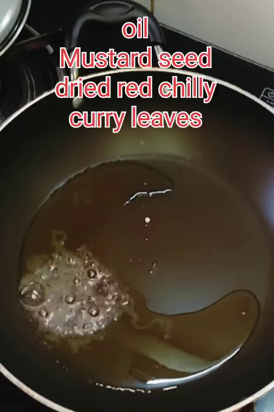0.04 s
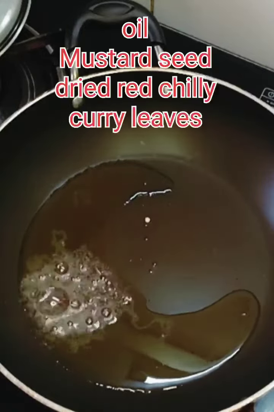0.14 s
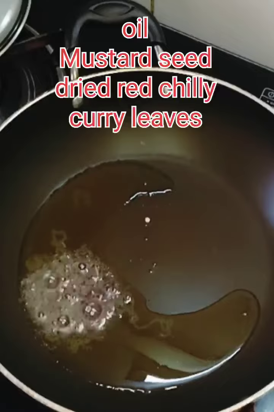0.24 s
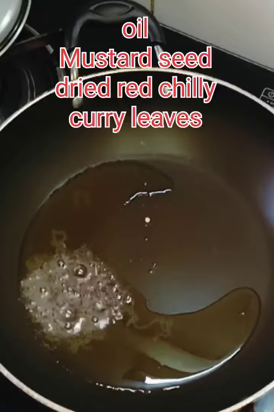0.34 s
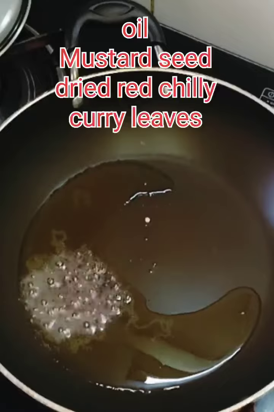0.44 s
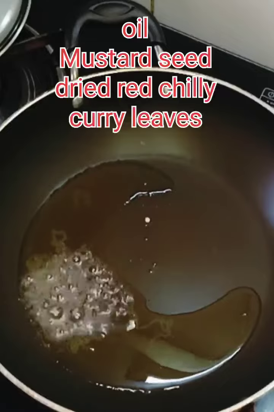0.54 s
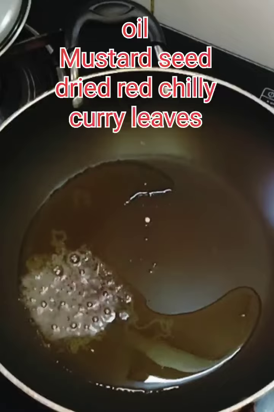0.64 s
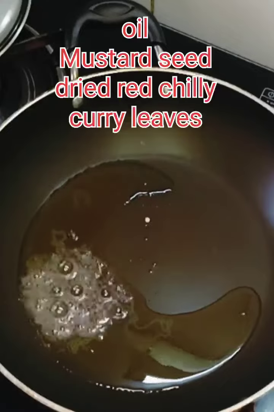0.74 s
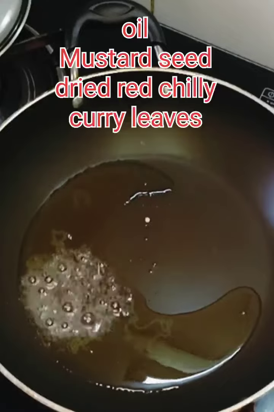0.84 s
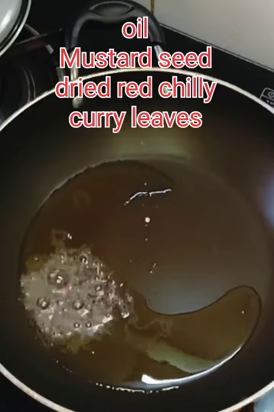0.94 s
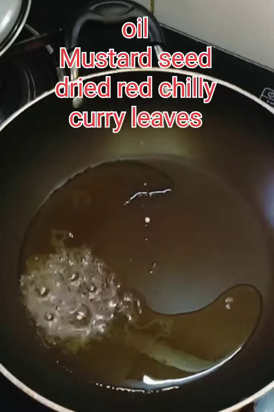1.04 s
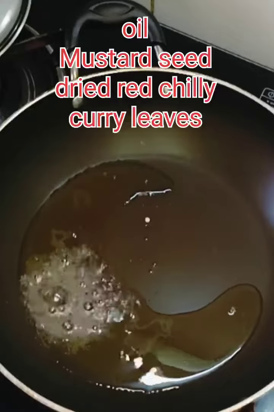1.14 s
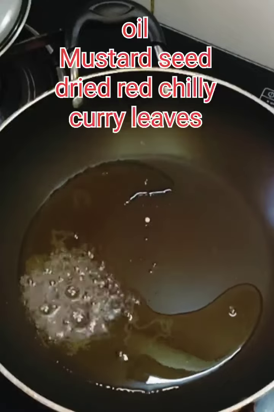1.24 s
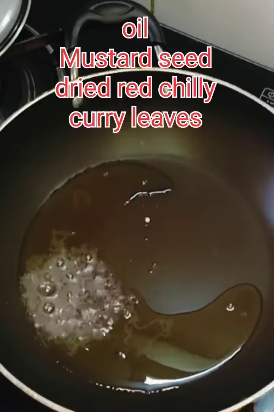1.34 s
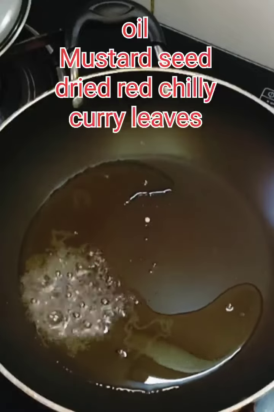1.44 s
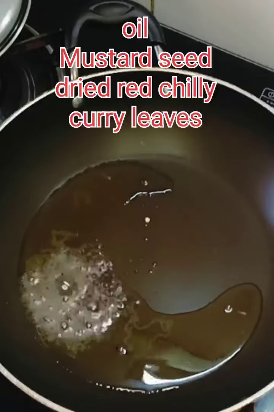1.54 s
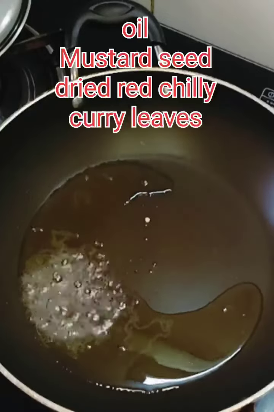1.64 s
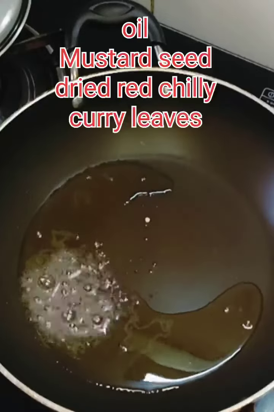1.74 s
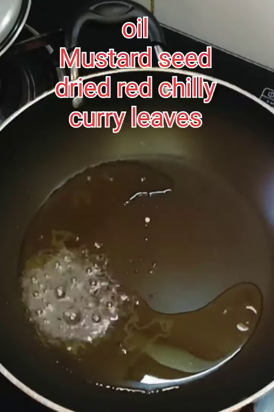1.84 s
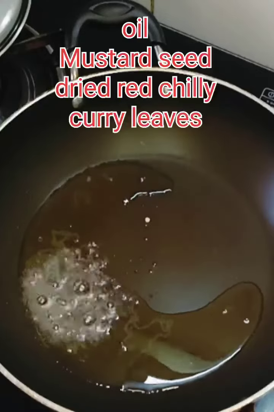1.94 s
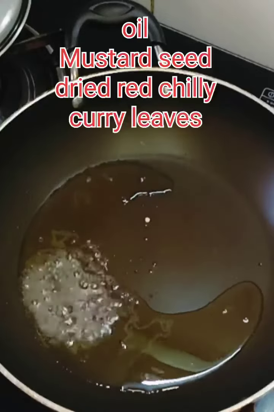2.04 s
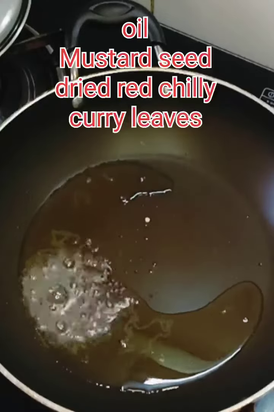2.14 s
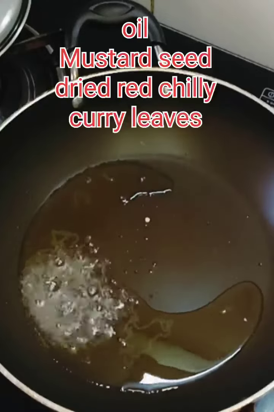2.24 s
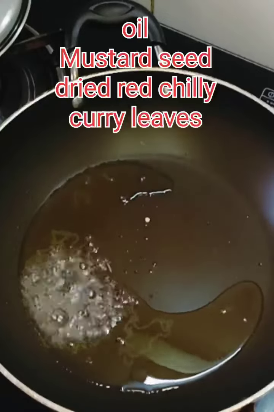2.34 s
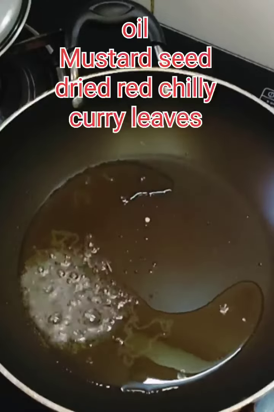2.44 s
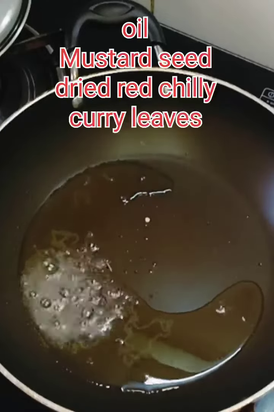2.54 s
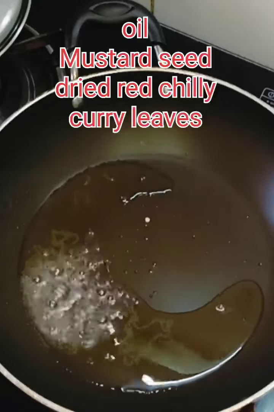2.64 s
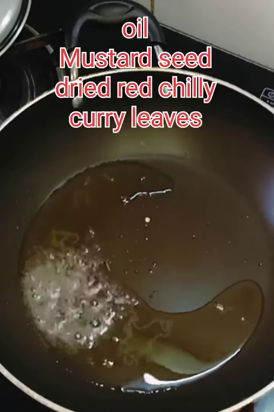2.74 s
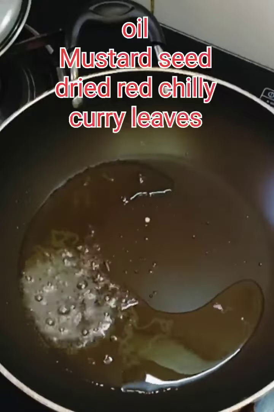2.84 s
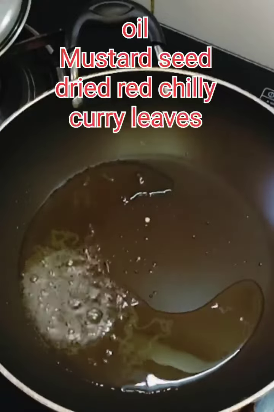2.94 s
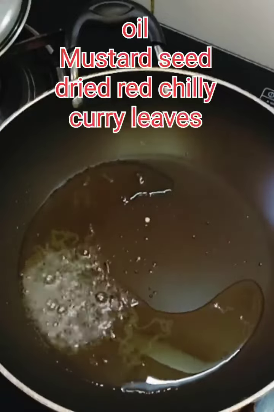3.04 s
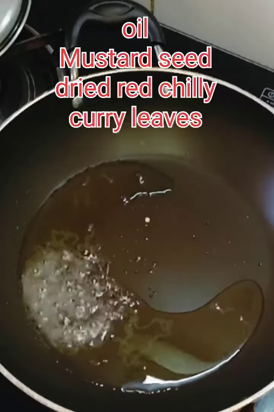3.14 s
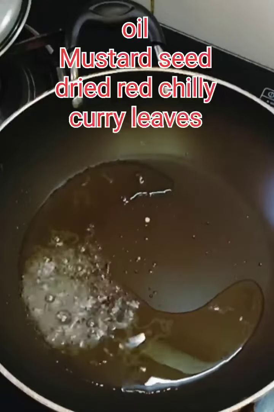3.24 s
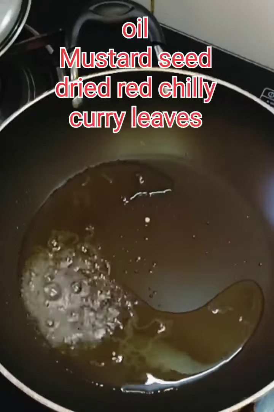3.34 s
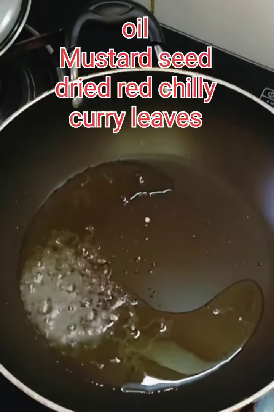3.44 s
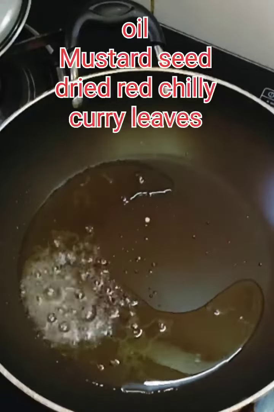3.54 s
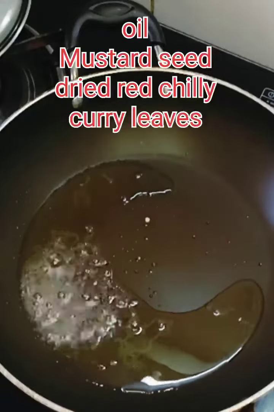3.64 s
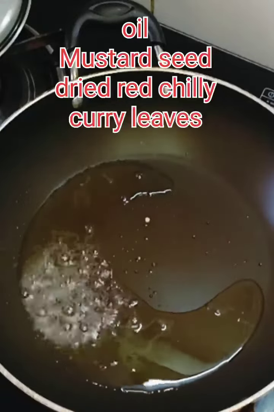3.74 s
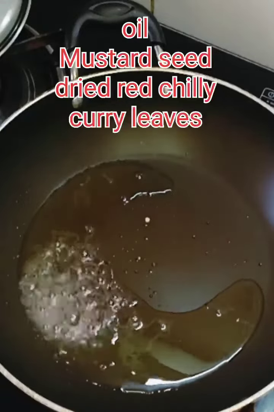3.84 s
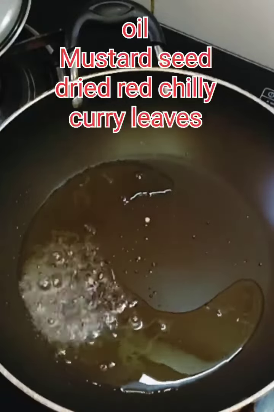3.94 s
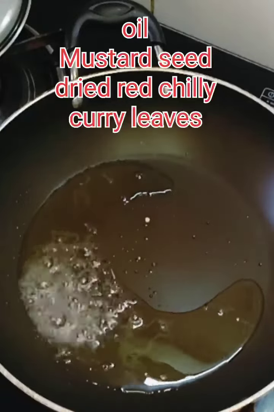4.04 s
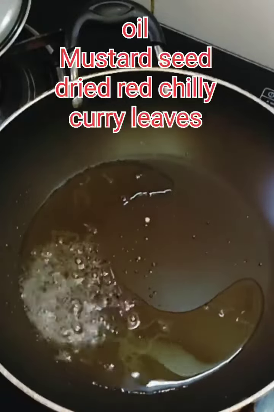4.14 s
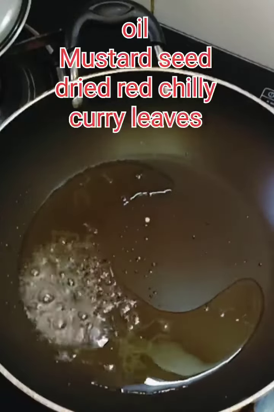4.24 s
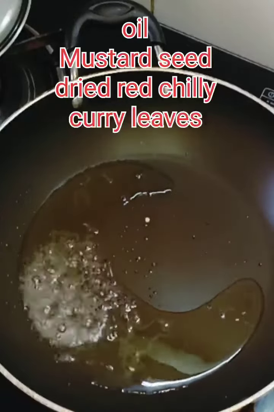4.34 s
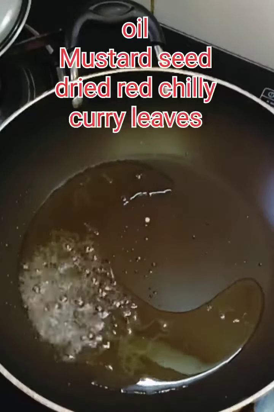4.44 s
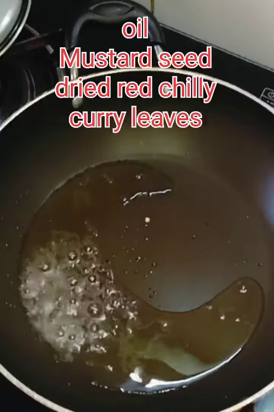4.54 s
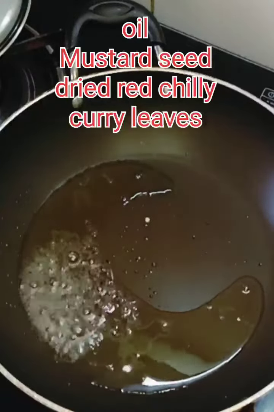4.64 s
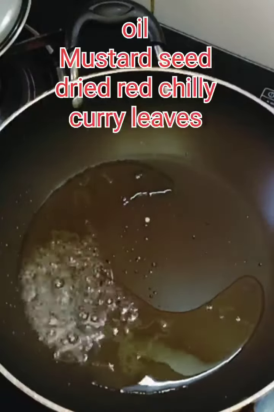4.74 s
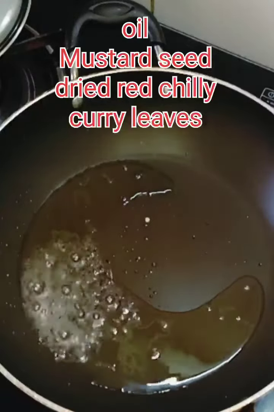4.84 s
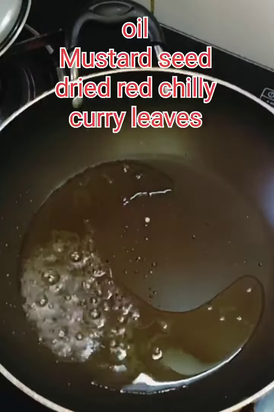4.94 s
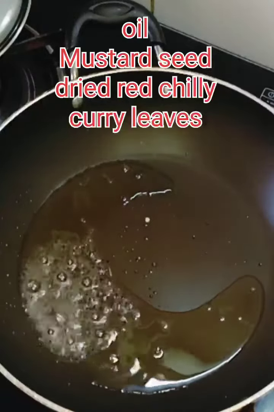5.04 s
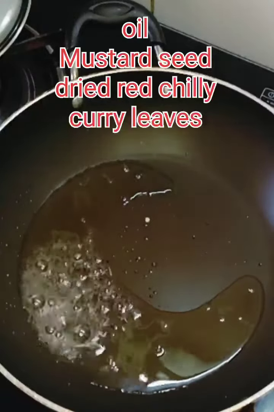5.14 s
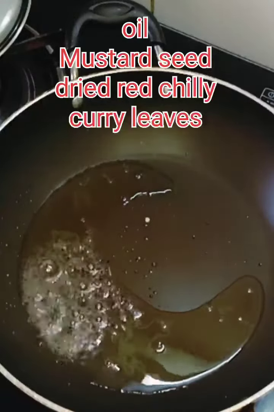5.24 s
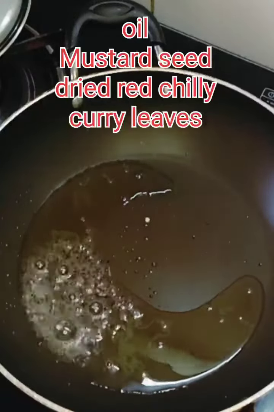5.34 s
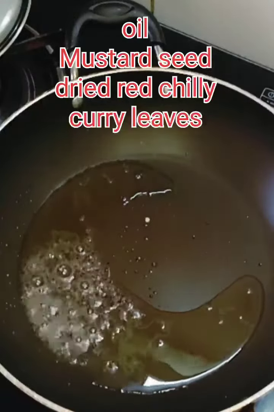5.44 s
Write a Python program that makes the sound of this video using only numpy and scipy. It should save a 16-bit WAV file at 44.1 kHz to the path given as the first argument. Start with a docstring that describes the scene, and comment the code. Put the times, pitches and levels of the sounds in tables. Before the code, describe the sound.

Mustard seeds crackle in frying oil, heard up close in a small, dry-sounding kitchen. Quiet hissing spurts and isolated sharp ticks give way to crowded pops, bubbling spits and wisps of steam. The frying is busiest in the second half, then eases. Faint metallic pan resonance colours the pops, over a steady dull background rush and a few low knocks. Mono sound, with the extreme top treble cut.

```python
"""Mustard seeds pop in a pan of hot oil on a kitchen cooktop.
Each husk snaps, rings its steam bubble and lets out a wisp of steam; among the pops the foam spits longer spurts.
As the frying builds, the sizzle rises, small pops crowd in and the bubbles grow and ring lower.
The sounds are made of shaped noise bursts and struck resonances.
Under them lie the low rush of the kitchen and a few soft bumps."""
import sys
import numpy as np
from scipy import signal
from scipy.io import wavfile

SR = 44100
rng = np.random.default_rng(int(sys.argv[2]) if len(sys.argv) > 2 else 0)


def inscribe(sig):
    """Save sig as 16-bit PCM at rate SR to the path in sys.argv[1].

    A 1-D sig is mono; a 2-D sig holds one channel per row.
    Samples are clipped to [-1, 1] before scaling.
    """
    pcm = np.round(np.clip(np.atleast_2d(sig).T, -1, 1) * 32767)
    wavfile.write(sys.argv[1], SR, pcm.astype(np.int16))


N = 242624  # length of the scene in samples

# how the pan passes on the ring of a bubble: [f/Hz, relative level/dB]
PAN_COLOUR = [(100, 0), (500, 16), (830, 4.5), (1080, 2), (1450, -0.5), (2200, 3.5), (3000, 3.5),
              (3800, -1.5), (5300, 3), (7000, -6.5), (12000, -6.5)]


def seeds(leak_lead_s=0.0092, leak_s=0.034, leak_db=-22, leak_hiss_db=-30,
          wisp_s=0.018, wisp_bubbling_db=-21.5, wisp_hiss_db=-15.5, wisp_share=0.43):
    """A bubble leaks just before it bursts, the husk snaps, and a wisp of steam follows, brighter after a bright snap."""
    # the pops at set times, loud and faint, levels before the trims in pop():
    # [t/s, bubble pitch f/Hz, bubble ring level/dB, husk snap level/dB, extra top treble of the snap/dB]
    timed_pops = [(.336, 2850, -32.5, -28.5, 4), (0.9044, 3200, -33, -18.5, 5),
                  (1.0366, 2840, -23, -16.5, 8), (1.1871, 4030, -23.5, -27, -17),
                  (1.251, 2830, -39, -23, 9), (1.3076, 3000, -60, -32, 7), (1.5135, 2900, -37, -34.5, -10),
                  (1.551, 2860, -35, -30, 11), (1.7982, 3140, -21, -33, 8), (1.8588, 2900, -20.5, -29, 9),
                  (1.9069, 2410, -41, -31, 5), (1.9497, 3100, -23.5, -25, 3), (2.082, 3020, -30, -17.5, 3),
                  (2.1067, 5590, -33, -18, 8), (2.1433, 3100, -15, -19, 1), (2.1908, 2550, -16.5, -20, -16),
                  (2.222, 3150, -26, -21.5, -16), (2.236, 2840, -16, -43, -10),
                  (2.2544, 2450, -23.5, -46, -23), (2.2959, 2140, -21.5, -19, 6),
                  (2.4484, 2226, -14.5, -30.5, -2), (2.5673, 2600, -22.5, -30.5, -5),
                  (2.6293, 3020, -28, -35, -11), (2.6356, 2530, -9.5, -45, 11),
                  (2.652, 2800, -17.5, -24, 0), (2.7667, 2460, -19.5, -19, -2),
                  (2.8078, 3070, -25.5, -13.5, -2), (2.8525, 2550, -17.5, -37, 10),
                  (2.8811, 4000, -34, -31, -17), (2.9325, 2730, -29, -28.5, -15),
                  (2.9465, 1860, -21, -28, -6), (2.968, 3200, -34, -34, 1), (3.0442, 5500, -31, -13.5, -13),
                  (3.0948, 4070, -16.5, -22.5, -33), (3.1232, 5060, -43, -11.5, 0),
                  (3.144, 5900, -19, -23, -14), (3.2246, 2080, -21, -29, 3), (3.2318, 2790, -32, -17, 4),
                  (3.253, 2176, -9.5, -24, 3), (3.2928, 3260, -22, -22, -16), (3.338, 3380, -18.5, -28, -7),
                  (3.4037, 2680, -16.5, -51, 0), (3.423, 2780, -22.5, -16.5, 8),
                  (3.447, 2510, -15.5, -28, -3), (3.4512, 2480, -32, -19, -2),
                  (3.5751, 5500, -23.5, -20, -26), (3.595, 5380, -38, -29.5, 10),
                  (3.659, 3900, -17.5, -38, 5), (3.717, 2670, -20, -28, -19),
                  (3.767, 2450, -18.5, -23.5, -16), (3.7892, 5560, -17.5, -20, -2),
                  (3.796, 5760, -24, -28, 12), (3.8162, 2380, -20.5, -21, 13),
                  (3.8309, 4340, -22, -23, -32), (3.848, 4660, -22, -25.5, -36),
                  (3.9385, 5600, -23, -16, -8), (4.0211, 2030, -15, -23.5, -43),
                  (4.0487, 1990, -13, -20.5, 7), (4.065, 2600, -14.5, -23, -24),
                  (4.146, 2400, -18, -29, -3), (4.165, 3050, -16, -31, 12), (4.1759, 2520, -10.5, -26, -12),
                  (4.2135, 2190, -17, -20, -10), (4.2265, 2160, -13, -22, -10), (4.236, 2380, -9.5, -29, 3),
                  (4.325, 2280, -9.5, -19.5, 3), (4.354, 2100, -25, -38, -2), (4.4, 2110, -23, -32.5, -5),
                  (4.4529, 2620, -17.5, -36, -7), (4.4559, 2800, -20, -20, 4),
                  (4.5593, 2020, -19.5, -25.5, -45), (4.6845, 2780, -15, -11, 5.5),
                  (4.746, 4600, -23, -30.5, -11), (4.7731, 2000, -12.5, -43, -7),
                  (4.812, 2290, -15.5, -24, -1), (4.8552, 3430, -27, -32.5, -26),
                  (4.9163, 2090, -5.5, -14, -8), (5.0305, 2580, -20, -24.5, 19),
                  (5.2147, 2260, -13.5, -26, -6), (5.2288, 4970, -22, -21.5, 0),
                  (5.3909, 4900, -25.5, -27.5, -3)]
    out = np.zeros(N)
    for s, hz, bubble_db, husk_db, top_db in timed_pops:
        leak = spurt(leak_s, hz, bubble_db + leak_db, bubble_db + leak_hiss_db)
        wisp = spurt(wisp_s, hz, bubble_db + wisp_bubbling_db, husk_db + wisp_hiss_db, wisp_share * top_db)
        add(out, s - leak_lead_s, leak)
        add(out, s, pop(hz, bubble_db, husk_db, top_db))
        add(out, s, wisp)
    return out


def pop(hz, bubble_db, husk_db, top_db, tear_s=0.00024, tear=0.3, wall_s=0.0015, wall=0.45,
        sharpness=6.74, torn_width=2.4, rattle=1.0, ring_db=-2.4, snap_db=-0.92):
    """A husk tears in a burst of fast-fading noise, and the steam bubble around it rings as a resonance."""
    # colour of a snapping husk: [f/Hz, relative level per Hz/dB]
    snap_colour = [(60, -33), (500, -5.5), (830, -8.5), (1050, -25), (2300, -6), (3300, -1), (3800, -12.5),
                   (5400, -2), (6300, -6), (7300, 5), (8200, 6.5), (9800, 1), (12000, -9.5), (15500, -20)]
    t = np.arange(SR // 14) / SR
    click = t == 0
    burst = click + tear * rng.standard_normal(len(t)) * np.exp(-t / tear_s)
    add(burst, wall_s * rng.uniform(.6, 1.6), wall * burst)  # first bounce off the pan wall
    snap = struck(through(burst, response(brightened(snap_colour, top_db))))

    # a hard snap tears the bubble wide open, so it rings only briefly
    torn = np.interp(husk_db - bubble_db, [-10, 2], [0, 1])
    width_hz = hz / sharpness * (1 + torn_width * torn)
    # a bubble that opens gently is pushed again one to four cycles later
    push = 1. * click
    add(push, rng.integers(1, 5) / hz, .9 * (1 - torn) * push)
    ring = resonate(push + rattle * burst, hz, width_hz)
    ring = through(ring, response(PAN_COLOUR))
    ring = struck(low_cut(ring, hz=900))  # so small a source radiates little bass

    snap_heard = gain_of(husk_db + snap_db) * echoed(snap, t, echo_db=-6.0)
    ring_heard = gain_of(bubble_db + ring_db) * echoed(ring, t, echo_db=-1.5)
    return snap_heard + ring_heard


def echoed(x, t, echo_db):
    """Echoes from the pan wall and the cooktop: random delayed copies, drawn anew for each sound."""
    # strength of the echoes: [t after the pop/s, relative level/dB]
    echo_strength = [(.002, 29), (.005, -13), (.007, 8.5), (.009, 15), (.0105, -4.5), (.015, -14),
                     (.02, -11), (.03, -80), (.06, -58)]
    strength = gain_of(np.interp(t, *np.transpose(echo_strength), left=-100))
    present = rng.random(len(t)) < .15
    taps = rng.standard_normal(len(t)) * present * strength
    return x + gain_of(echo_db) * np.std(x) * evened(through(x, taps))


def thumps():
    """A few of the heaviest pops also give a dull low thump: a click given a dull colour."""
    # the thumps: [t/s, level/dB]
    thump_times = [(1.0371, -22.5), (3.0441, -34), (3.7893, -30.5), (3.816, -33.5), (4.6844, -23)]
    # colour of a thump: [f/Hz, relative level per Hz/dB]
    thump_colour = [(25, -10), (100, 9.5), (400, 4), (800, 13), (1100, 2), (2500, -21), (8000, -63)]
    out = np.zeros(N)
    for s, db in thump_times:
        add(out, s, gain_of(db) * struck(response(thump_colour)))
    return out


def spurt(length_s, hz, bubble_db, steam_db, lift_db=0, bubble_width=0.3, crater_width_hz=3500,
          jet_width_hz=1300, jet=0.87, wet_top_db=-5, dry_top_db=2, bubbling_db=1.5, hiss_db=2.5, size=5000):
    """Steam escapes through the foam: a swell of tiny bursts that hiss and shake a bubble."""
    # colour of hissing steam: [f/Hz, relative level per Hz/dB]
    hiss_colour = [(150, -46), (600, -14.5), (850, 4), (1080, -2.5), (2000, -2), (3000, -3.5), (4000, -3.5),
                   (5500, -3), (6300, -2), (7600, -3), (8700, 1.5), (10000, 1.5), (12000, -4.5),
                   (15500, -4.5)]
    count = int(np.clip(length_s * SR, size // 20, size))  # at most size samples
    swell = np.sin(np.linspace(0, np.pi, count))

    # dry steam hisses brightly, a wet bubbling spurt is duller
    top_db = lift_db + np.interp(steam_db - bubble_db, [-8, 6], [wet_top_db, dry_top_db])
    hiss = crackle(size, per_s=3000, spread_db=4.0, smooth=0.63)[:count]
    hiss = evened(through(hiss, response(brightened(hiss_colour, top_db))))
    whistle = resonate(hiss, rng.uniform(7300, 8720), jet_width_hz)  # each jet has its own pitch
    hiss = evened(hiss + jet * evened(whistle))

    bubbling = crackle(size, per_s=900, spread_db=2.5, smooth=0.77)[:count]
    bubbling = resonate(bubbling, hz, bubble_width * hz)
    bubbling = resonate(bubbling, hz, crater_width_hz)  # the crater in the foam narrows it further
    bubbling = evened(through(bubbling, response(PAN_COLOUR)))
    return swell * (gain_of(steam_db + hiss_db) * hiss + gain_of(bubble_db + bubbling_db) * bubbling)


def foam(tick_ring_db=12, tick_snap_db=11, spit_s=0.037, spit_bubbling_db=2, spit_hiss_db=-4):
    """The foam lets out its spurts at set times, with small ticks and spits added at random."""
    # the spurts at set times, before the limits and trims in spurt():
    # [t/s, length t/s, bubble pitch f/Hz, bubbling level/dB, hiss level/dB]
    timed_spurts = [(0.382, 0.034, 2980, -35.5, -29), (.468, 0.069, 2980, -57, -50),
                    (0.743, 0.043, 3000, -50, -39.5), (0.834, 0.052, 2160, -46, -38.5),
                    (0.904, 0.023, 5040, -41, -30), (.936, .052, 2600, -59, -49),
                    (1.063, 0.065, 3020, -39.5, -31), (1.223, .05, 3180, -55, -45),
                    (1.322, 0.084, 3060, -48.5, -42.5), (1.402, 0.039, 2940, -39.5, -30),
                    (1.425, 0.086, 3000, -55, -39), (1.595, 0.042, 3020, -43, -34.5),
                    (1.703, 0.037, 3150, -50, -40.5), (1.786, 0.07, 2800, -36, -30),
                    (1.879, 0.03, 2640, -40.5, -51), (1.952, .022, 3030, -35, -30.5),
                    (1.967, 0.053, 1670, -47, -50), (2.05, .034, 2820, -46, -43),
                    (2.12, 0.048, 2900, -33.5, -32), (2.176, 0.049, 2600, -40, -35),
                    (2.249, 0.019, 6800, -30.5, -56), (2.288, 0.07, 2880, -34.5, -36.5),
                    (2.363, .045, 2700, -59, -42), (2.412, 0.028, 2700, -39, -40.5),
                    (2.452, 0.031, 2670, -31, -58), (2.507, 0.047, 3050, -34.5, -27),
                    (2.53, 0.068, 1590, -35.5, -46), (2.629, 0.035, 2470, -24, -52),
                    (2.707, 0.039, 6700, -42, -38), (2.728, 0.075, 2060, -39, -49),
                    (2.764, 0.044, 5100, -35.5, -37), (2.892, 0.072, 2760, -39.5, -40),
                    (2.987, 0.03, 2500, -28, -26.5), (3.13, 0.092, 2720, -40, -34.5),
                    (3.148, 0.044, 2040, -26, -50), (3.194, 0.034, 6100, -35, -39),
                    (3.282, 0.04, 1980, -33.5, -54), (3.332, 0.066, 2930, -36.5, -43),
                    (3.495, 0.041, 2160, -34, -36.5), (3.601, 0.052, 5400, -43, -39),
                    (3.624, 0.062, 1920, -31, -50), (3.671, 0.15, 2220, -32.5, -43),
                    (3.733, 0.029, 2260, -38, -29), (3.791, 0.03, 2590, -24.5, -33),
                    (3.83, .047, 4600, -28.5, -53), (3.875, .037, 2760, -37.5, -33),
                    (3.967, 0.043, 2060, -39.5, -31.5), (4.065, 0.02, 4640, -22.5, -52),
                    (4.067, 0.068, 2460, -29.5, -46), (4.139, 0.04, 5440, -27, -38),
                    (4.2, 0.054, 2380, -28, -37.5), (4.267, 0.03, 1880, -26.5, -43.5),
                    (4.41, 0.041, 5050, -27.5, -40), (4.414, 0.038, 2430, -28.5, -42),
                    (4.543, 0.073, 2620, -33, -40), (4.578, 0.044, 2420, -23.5, -30.5),
                    (4.622, 0.047, 2500, -28.5, -33), (4.671, 0.038, 4740, -30.5, -53),
                    (4.712, 0.037, 2630, -38.5, -36), (4.803, 0.029, 2230, -47, -39),
                    (4.864, 0.071, 2160, -32, -42.5), (4.944, 0.035, 4140, -33.5, -55),
                    (4.95, 0.029, 2830, -27, -39.5), (4.992, 0.03, 2060, -25, -40),
                    (5.044, 0.04, 2000, -40, -38), (5.143, 0.049, 1980, -37, -49.5),
                    (5.216, 0.017, 1810, -31, -45), (5.254, 0.022, 1950, -33, -43),
                    (5.293, 0.031, 2000, -35, -49), (5.356, 0.065, 2330, -38, -54),
                    (5.457, 0.044, 2640, -37.5, -39)]
    out = np.zeros(N)
    for s, *shape in timed_spurts:
        add(out, s, spurt(*shape))
    for s, hz, bubble_db, husk_db in small_bursts(count=30, spread_db=15):
        add(out, s, pop(hz, bubble_db + tick_ring_db, husk_db + tick_snap_db, top_db=-6))
    for s, hz, bubble_db, steam_db in small_bursts(count=60, spread_db=5):
        add(out, s, spurt(spit_s, hz, bubble_db + spit_bubbling_db, steam_db + spit_hiss_db))
    return out


def small_bursts(count, spread_db, crowding=1.6, start_hz=3280, sag_hz_per_s=257, scatter_octaves=.25,
                 young_share=.3, young_ratio=1.95):
    """Chance bursts, denser and louder the harder it fries: rows (s, bubble Hz, bubble dB, snap or hiss dB)."""
    draws, clock = rng.random((count, 5)), np.arange(N) / SR
    # share the bursts out in time by a running total of the frying
    due = np.cumsum(gain_of(crowding * frying_db(clock)))
    s = np.interp((np.arange(count) + draws[:, 0]) / count, due / due[-1], clock)
    # the bubbles grow as the foam spreads, so their usual pitch sinks
    usual_hz = start_hz - sag_hz_per_s * s
    hz = usual_hz * 2 ** (scatter_octaves * (2 * draws[:, 1] - 1))
    # some bubbles are young and small, and ring higher
    hz = hz * np.where(draws[:, 2] < young_share, young_ratio, 1)
    bubble_db, burst_db = frying_db(s) - spread_db * draws[:, 3:].T
    return zip(s, hz, bubble_db, burst_db)


def frying_db(s):
    """How hard the oil fries at time s, as a level that steers the sizzle, the simmer and the small bursts."""
    # course of the frying: [t/s, level before trims/dB]
    frying = [(0, -60), (.78, -58), (1.05, -52), (1.95, -50.5), (2.3, -43.5), (2.8, -48), (3.2, -45),
              (4.1, -42.5), (4.4, -47.5), (4.85, -43), (5.2, -50.5), (5.5, -52.5)]
    return np.interp(s, *np.transpose(frying))


def pan_ring(x):
    """The pan and the air in it ring faintly, as resonances driven by the pops and spurts."""
    # their modes: [f/Hz, width f/Hz, level/dB]
    pan_modes = [(833, 29, 3.5), (1433, 54, 2), (2037, 125, -9), (2520, 110, -28), (5430, 63, -11),
                 (8600, 60, -29)]
    return x + sum(gain_of(db) * resonate(x, hz, width_hz) for hz, width_hz, db in pan_modes)


def kitchen(x, t60=0.073, wet_db=-21):
    """A faint short tail from the room: fading noise that falls 60 dB in t60 seconds."""
    t = np.arange(SR // 2) / SR
    tail = rng.standard_normal(len(t)) * gain_of(-60 * t / t60) * (t > .008)
    return x + gain_of(wet_db) * through(x, tail / np.linalg.norm(tail))


def sizzle(trim_db=-2):
    """The fine sizzle of the oil: bright crackling noise that follows the frying."""
    # colour of the sizzle: [f/Hz, relative level per Hz/dB]
    fine_colour = [(2000, -5), (3000, -25), (4000, -9), (6300, -8.5), (8000, 1), (9500, -3.5), (12000, -13),
                   (15500, -13.5)]
    noise = crackle(N, per_s=1000, spread_db=4.5, smooth=3.8)
    noise = through(noise, response(fine_colour)) * waver(21.42, depth_db=4.0)
    return gain_of(frying_db(np.arange(N) / SR) + trim_db) * evened(noise)


def simmer(brisk_db=-45, brisk_level_db=-50.5, slope=1.87):
    """The simmer of the foam: crackling through a broad resonance, rising faster than the frying level."""
    noise = resonate(crackle(N, per_s=810, spread_db=6, smooth=0.35), 1840, 1140)
    noise = through(noise, response(PAN_COLOUR)) * waver(30, depth_db=2.5)
    # brisk_level_db holds when the frying level is at brisk_db; slope is dB of simmer per dB of frying
    level_db = brisk_level_db + slope * (frying_db(np.arange(N) / SR) - brisk_db)
    return gain_of(level_db) * evened(noise)


def bumps(rise_s=0.0014, overtone=0.23, overtone_ratio=2.3, shudder=0.47, shudder_hz=170,
          shudder_width_hz=110, linger=0.89, sag=0.57, settle_s=0.0032):
    """Dull low knocks, each starting high and settling at once, with one overtone and a brief shudder."""
    # the bumps: [t/s, settled pitch f/Hz, level/dB, time for the tone to fall 60 dB t/s]
    soft_bumps = [(1.669, 106, -31.5, 0.35), (2.057, 126, -32, 0.077), (2.708, 106, -31, 0.2),
                  (3.059, 108.6, -30, 0.19), (3.315, 108, -25.5, 0.14), (3.735, 73, -14, 0.036),
                  (4.865, 117, -29, 0.2)]
    out, t = np.zeros(N), np.arange(SR // 3) / SR
    for s, hz, db, t60 in soft_bumps:
        turns = np.cumsum(hz * (1 + sag * np.exp(-t / settle_s))) / SR  # cycles so far
        tone = np.sin(2 * np.pi * turns) + overtone * np.sin(2 * np.pi * overtone_ratio * turns)
        shake = resonate(rng.standard_normal(len(t)), shudder_hz, shudder_width_hz)
        shake = evened(resonate(shake, shudder_hz, shudder_width_hz))
        knock = shudder * shake * gain_of(-60 * t / (linger * t60)) - tone * gain_of(-60 * t / t60)
        add(out, s, gain_of(db) * (1 - np.exp(-t / rise_s)) * knock)
    return out


def kitchen_rush():
    """The low rush of the kitchen: noise with a dark colour and a wavering level."""
    # colour of the rush: [f/Hz, relative level per Hz/dB]
    rush_colour = [(20, -10), (55, -10.5), (105, 3), (165, 0.5), (235, -4.5), (350, -4), (420, -2.5),
                   (580, -1), (800, -8), (930, -7), (1200, -9), (2800, -20), (4500, -31), (12000, -49)]
    # course of the rush: [t/s, level/dB]
    rush_level = [(0, -48), (.78, -48), (1.05, -44.5), (3.2, -45.5), (5.5, -47)]
    noise = through(rng.standard_normal(N), response(rush_colour, size=8192)) * waver(22, depth_db=2.0)
    return gain_of(np.interp(np.arange(N) / SR, *np.transpose(rush_level))) * evened(noise)


def crackle(count, per_s, spread_db, smooth):
    """Tiny bursts of uneven size over a smooth hiss."""
    size = gain_of(spread_db * np.minimum(rng.exponential(1, count), 4)) * rng.choice([-1, 1], count)
    bursts = evened(size * (rng.random(count) < per_s / SR))
    return evened(bursts + smooth * rng.standard_normal(count))


def waver(per_s, depth_db):
    """A gain that wanders at random, with per_s new random levels each second."""
    knots = np.arange(0, N / SR + 1, 1 / per_s)
    return gain_of(depth_db * np.interp(np.arange(N) / SR, knots, rng.standard_normal(len(knots))))


def brightened(points, top_db):
    """Lifts or lowers the top treble of a colour, in full from 12 kHz up."""
    hz, db = np.transpose(points)
    return np.transpose([hz, db + top_db * np.interp(hz, [8200, 12000], [0, 1])])


def response(points, size=2048):
    """The impulse response of a colour: what a click becomes, with nothing heard before it."""
    hz, db = np.transpose(points)
    bins_hz = abs(np.fft.fftfreq(size, 1 / SR))
    log_gain = np.log(gain_of(np.interp(np.log(bins_hz + 1), np.log(hz), db)))
    spectrum = np.exp(np.conj(signal.hilbert(log_gain)))  # minimum phase: energy comes early
    return np.fft.ifft(spectrum).real[:size // 2]


def through(x, taps):
    """Passes x through an impulse response."""
    return signal.fftconvolve(x, taps)[:len(x)]


def resonate(x, hz, width_hz):
    """One resonance: the narrower it is, the longer it rings."""
    return signal.lfilter(*signal.iirpeak(hz, hz / width_hz, SR), x)


def low_cut(x, hz, order=2):
    """Weakens what lies below hz."""
    return signal.lfilter(*signal.butter(order, hz, "high", fs=SR), x)


def gain_of(db):
    """Decibels to gain."""
    return 10 ** (np.asarray(db) / 20)


def evened(x):
    """Scales to an rms (average strength) of 1."""
    return x / np.sqrt(np.mean(x ** 2) + 1e-20)


def struck(x, size=132):
    """Scales to rms 1 over the first size samples, three milliseconds by default."""
    return x / np.sqrt(np.mean(x[:size] ** 2) + 1e-20)


def add(mix, s, sound):
    """Adds a sound to the mix at time s."""
    part = mix[max(round(s * SR), 0):][:len(sound)]
    part += sound[:len(part)]


def scene():
    """The frying pan in its kitchen."""
    pan = kitchen(pan_ring(seeds() + foam()))
    background = sizzle() + simmer() + bumps() + kitchen_rush()
    return (pan + thumps() + background)[None]


def record(dry, low_cut_hz=36, edge_hz=15650):
    """The microphone sheds the deepest bass, peaks are clipped at full scale, then the top treble is cut off."""
    heard = np.clip(low_cut(dry, low_cut_hz, order=1), -1, 1)
    lowpass = signal.firwin(301, edge_hz, window=("kaiser", 9), fs=SR)
    return signal.oaconvolve(heard, lowpass[None], "same")


dry = scene()
out = record(dry)
inscribe(out)
```